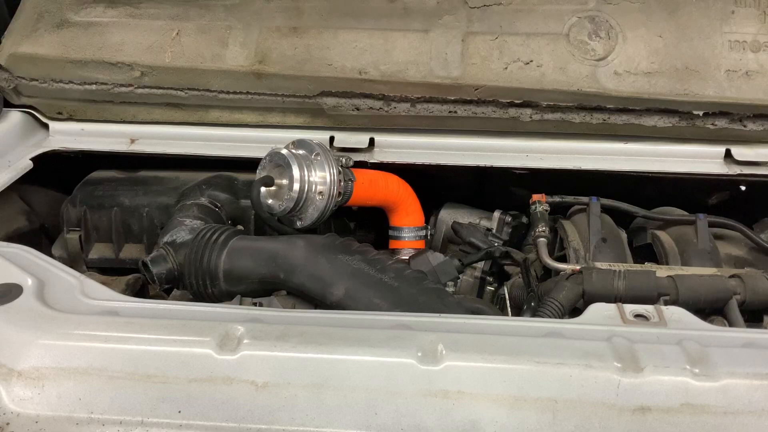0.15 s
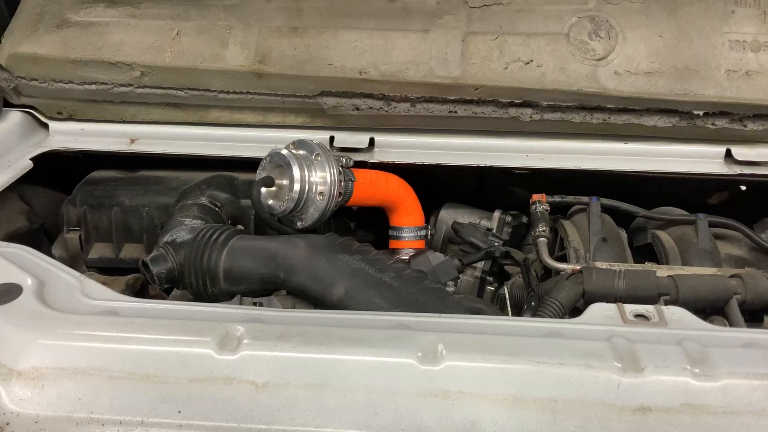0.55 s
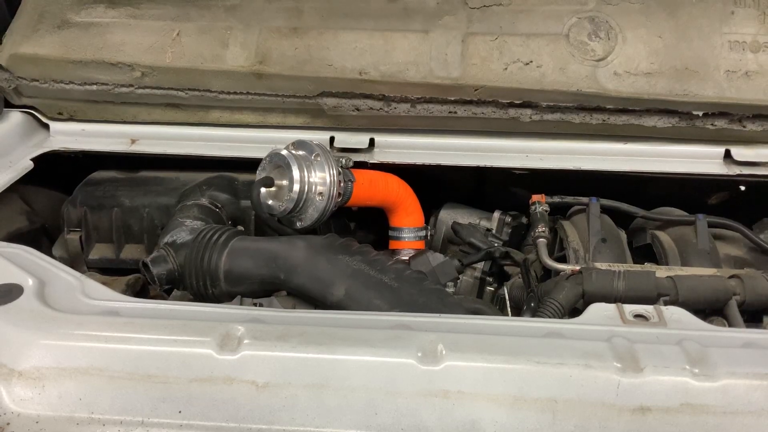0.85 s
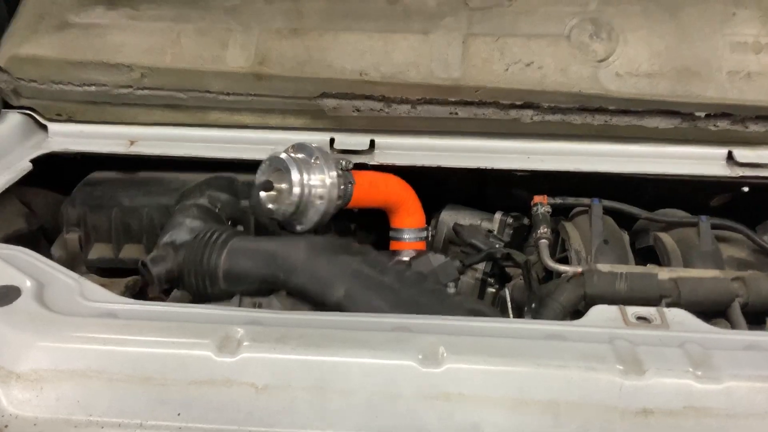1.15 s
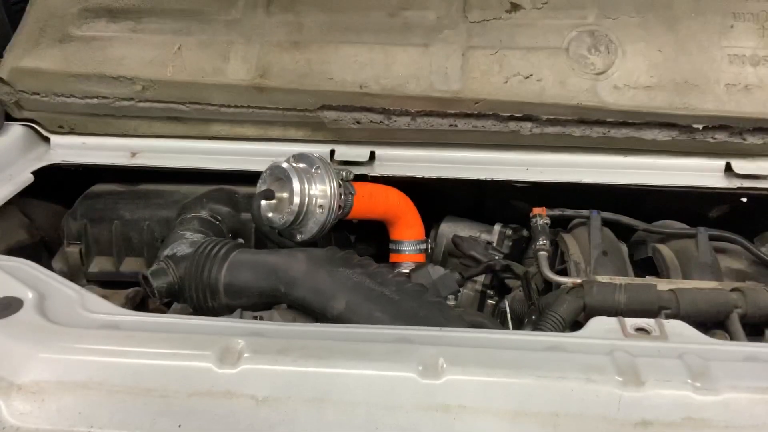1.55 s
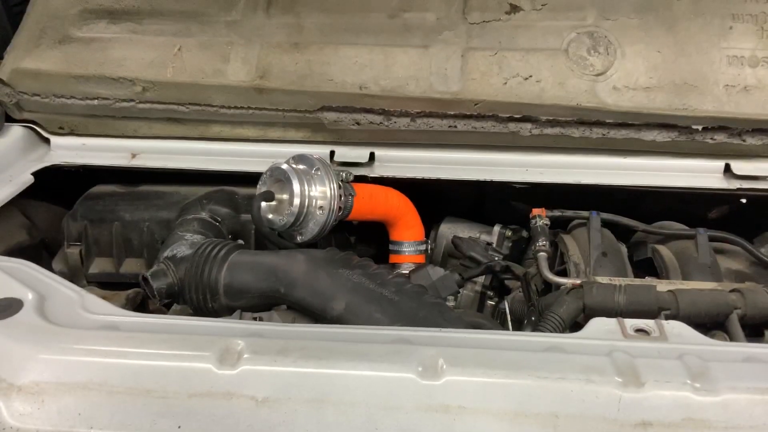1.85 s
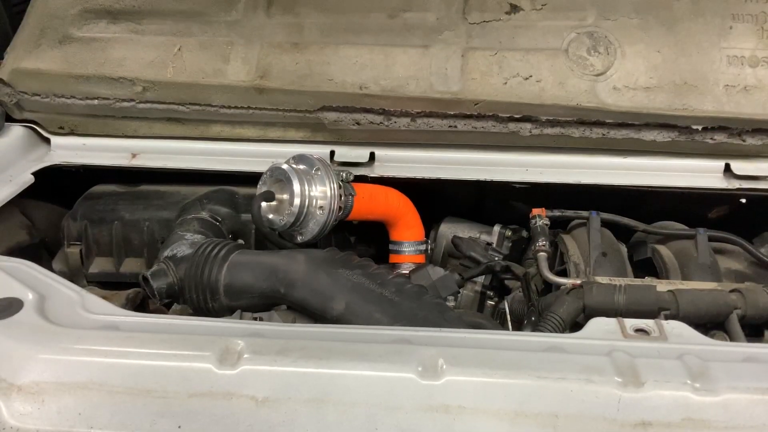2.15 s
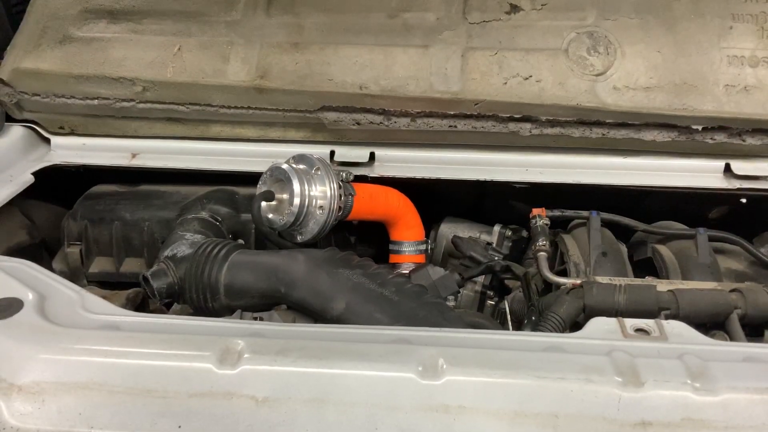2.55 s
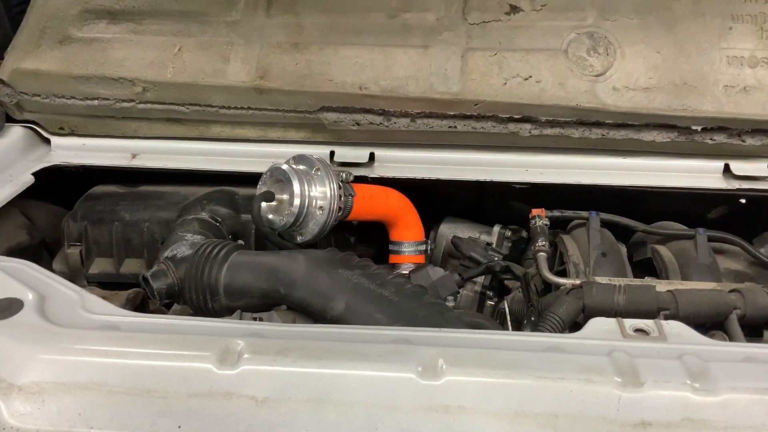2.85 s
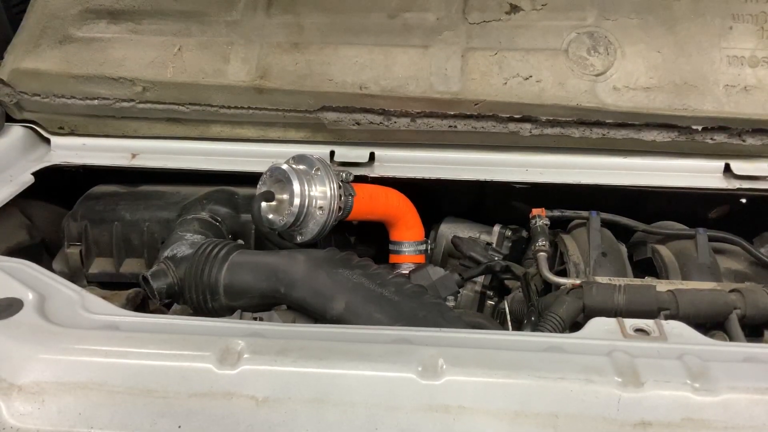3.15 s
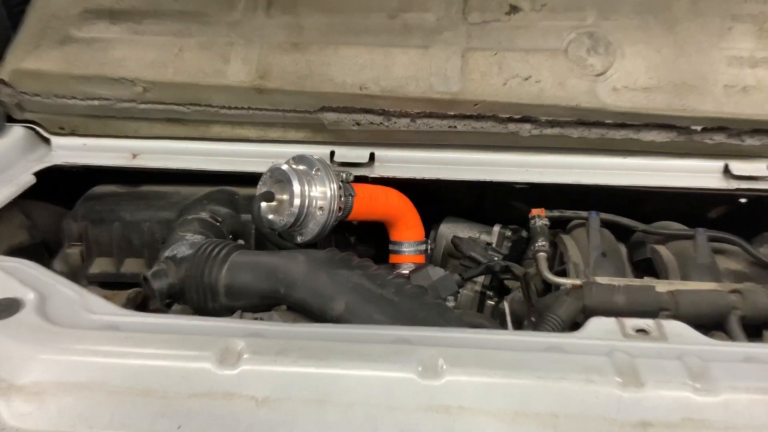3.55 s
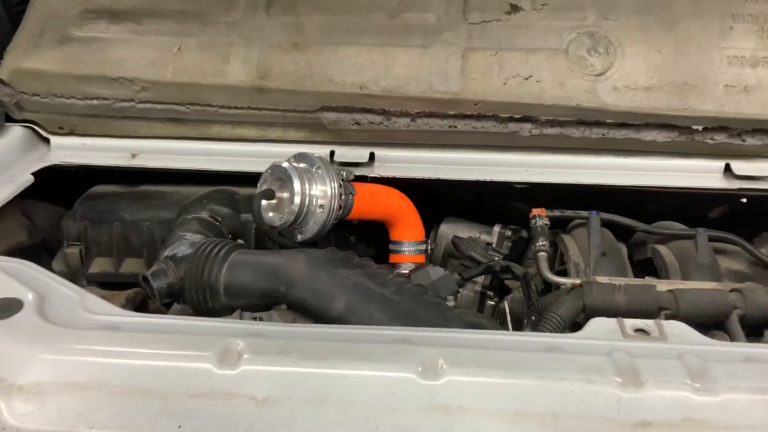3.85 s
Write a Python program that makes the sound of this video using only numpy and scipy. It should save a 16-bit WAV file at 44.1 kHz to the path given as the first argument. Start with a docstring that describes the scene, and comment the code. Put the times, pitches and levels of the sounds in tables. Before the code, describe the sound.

Car engine starting in its open bay: brief starter whirr, throbbing idle, sharp rev, blow-off hiss.

```python
"""A car engine starts and is blipped, heard from just above the open engine bay: each firing makes a deep gulp,
a click ringing through the air box. A thin whine and a relay thud come first; the starter, made of gear-tooth
clicks and tones, cranks three times. The engine catches and idles with clattering valve gear and ticking
injectors (shaped noise), then revs up with a rasp until the throttle shuts, chuffs and a blow-off valve hisses.
"""
import sys
import numpy as np
from scipy import signal
from scipy.fft import rfft, irfft
from scipy.io import wavfile
from scipy.ndimage import uniform_filter1d

SR = 44100
rng = np.random.default_rng(int(sys.argv[2]) if len(sys.argv) > 2 else 0)


def to_wav(s):
    """Save 16-bit WAV."""
    ch = np.atleast_2d(s).T  # columns
    pcm = np.round(np.clip(ch, -1, 1) * 32767)  # PCM
    wavfile.write(sys.argv[1], SR, pcm.astype(np.int16))


N = 176400
T = np.arange(N) / SR  # seconds
FREQS = np.fft.rfftfreq(N, 1 / SR)  # Hz

# Engine speed. Each row: time in seconds, firings per second.
ENGINE_SPEED = [(0.7, 4.3), (0.9, 8.37), (1.05, 6.56), (1.15, 19.77), (1.25, 28.46), (1.37, 33.78),
                (1.5, 34.15), (1.68, 32.57), (2.05, 32.64), (2.4, 33.18), (3.0, 32.59), (3.17, 36.8),
                (3.3, 45.38), (3.45, 64.33), (3.6, 91.69), (3.7, 103.71), (3.78, 100.0), (4.0, 91.0)]
# Strength of the intake gulps. Each row: time in seconds, relative level in dB.
GULP_LEVEL = [(1.07, -70), (1.11, 0), (1.2, .5), (1.35, .5), (2.0, -.3), (3.0, -.3), (3.12, -2), (3.3, 1.2),
              (3.42, -.8), (3.51, -1.3), (3.6, -6.5), (3.69, -6), (3.76, -13), (3.89, -17), (4.0, -9)]
# How the air box responds to a gulp. Each row: frequency in Hz, relative level in dB.
AIR_BOX = [(20, -42), (50, -14), (66, -4.5), (99, 1.2), (132, -3), (165, -9), (198, -21), (231, -26),
           (264, -17.5), (297, -14), (330, -29), (362, -27), (410, -46), (1200, -85)]
# The softer gulp of a cylinder that has not fired. Each row: frequency in Hz, relative level in dB.
UNFIRED_PUFF = [(15, -21.5), (35, -10.5), (75, 2.5), (100, -16.5), (135, -33), (300, -42.5)]
# Rasp of the open throttle. Each row: time in seconds, relative level in dB.
RASP_LEVEL = [(3.05, -55), (3.25, -30), (3.38, -22.5), (3.53, -20), (3.59, -14), (3.65, -20), (3.76, -25),
              (3.82, -36)]
# Colour of the rasp in the intake pipe. Each row: frequency in Hz, relative level in dB.
INTAKE_PIPE = [(130, -20), (200, 1), (290, 5), (370, -6), (720, -4), (850, -14), (1150, -13), (2500, -32.5)]
# Strength of each cylinder's bark: one relative level in dB per cylinder, in firing order.
CYLINDER_BARK = [2, -1.5, 1, -2.5]
# Air surging back against the shut throttle. Each row: time in seconds, level in dB.
CHUFF_TIMES = [(3.73, -15), (3.768, -15), (3.86, -21), (3.92, -16), (3.995, -14)]
# Clatter of the running engine. Each row: time in seconds, level in dB before its throb.
CLATTER_LEVEL = [(1.08, -56), (1.3, -23), (1.45, -31), (1.7, -34.5), (3.0, -34.5), (3.2, -31), (3.45, -23),
                 (3.6, -18.5), (3.67, -19), (3.76, -17.5), (3.81, -26.5), (4.0, -23)]
# Colour of the clatter from the engine block. Each row: frequency in Hz, relative level in dB.
ENGINE_BLOCK = [(240, 1.5), (400, 4), (700, 0.5), (850, -3), (1120, -3), (1400, -7), (2050, -3), (2700, -9),
                (5000, -14.5), (9000, -13.5), (14000, -46)]
# Injector ticks after each firing. Each row: delay in seconds, relative level in dB, decay in seconds.
INJECTOR_TICKS = [(.0064, -24.5, 0.0024), (0.0098, -25.5, 0.0081)]
# Colour of the injector ticks. Each row: frequency in Hz, relative level in dB.
INJECTOR_COLOUR = [(1500, -67), (4000, -11), (8000, -9), (9900, -3), (11500, -4.5), (14500, 2), (16000, -1)]
# Air hissing past the throttle. Each row: time in seconds, level in dB before its flicker.
THROTTLE_AIR = [(.5, -77), (.68, -34), (1.05, -32), (1.09, -24.5), (1.31, -21), (1.38, -36.5), (1.7, -50),
                (3.1, -46), (3.3, -32), (3.55, -24.5), (3.77, -15.5), (4.0, -29)]
# Blow-off valve. Each row: time in seconds, level in dB before its flicker.
BLOW_OFF_VALVE = [(3.76, -60), (3.79, -22), (3.815, -17), (3.87, -13), (4.0, -15.5)]
# Colour of hissing air. Each row: frequency in Hz, relative level in dB.
HISS_COLOUR = [(1500, -27), (4000, -8.5), (6500, -6), (9500, -2.5), (11300, 1), (13500, 0.5), (15500, 0.5)]
# Starter gear speed. Each row: time in seconds, tooth strikes per second (Hz) before the crank swing.
GEAR_MESH = [(.5, 250), (.61, 335), (.67, 312), (.71, 510), (.78, 510), (.9, 545), (1.12, 540), (1.21, 706),
             (1.32, 714), (1.55, 442)]
# Grinding of the starter gears. Each row: time in seconds, level in dB before the crank swell.
GRIND_LEVEL = [(.5, -51), (.525, -19), (.55, -23), (.59, -21), (.69, -25), (1.0, -25), (1.08, -22),
               (1.32, -24), (1.38, -66)]
# Clean gear whine. Each row: time in seconds, then the levels in dB, before the load swell,
# of the tooth-strike tone, of its 2nd multiple and of its 3rd multiple.
GEAR_TONES = [(.5, -60, -70, -70), (.55, -28, -36, -38), (.6, -29, -34, -36), (.64, -21, -29, -34),
              (.68, -44, -55, -55), (.76, -19.5, -35, -35), (1.08, -19.5, -33, -30), (1.14, -45, -43, -31),
              (1.32, -48, -48, -27), (1.39, -75, -75, -70)]
# Ringing of the bell housing. Each row: frequency in Hz, relative level in dB.
BELL_HOUSING = [(200, -8), (500, 3), (700, -3.5), (1100, 3.5), (2100, 0.5), (4300, -4.5), (6000, -12.5),
                (8200, -12), (15000, -71)]
# Separate knocks. Each row: time in seconds, level in dB, decay in seconds, ring frequency in Hz,
# ring level in dB and crash level in dB (these two relative to the knock).
KNOCK_TIMES = [(0.229, -41.5, 0.0095, 1430, -2, 3.5), (0.292, -44, 0.023, 320, -2, -14),
               (0.461, -26, 0.02, 172, 1, -14.5), (0.521, -17, 0.031, 680, -2, 1.5),
               (0.542, -15, 0.02, 281, 0, 6.5), (0.555, -25.5, .016, 1144, -3, 2),
               (1.314, -18.5, 0.0063, 450, 0, -6)]
# Colour of a metal crash. Each row: frequency in Hz, relative level in dB.
METAL_CRASH = [(100, -15), (400, -4.5), (1200, -3), (3000, -14.5), (7000, -17.5), (10000, -16.5),
               (15000, -22.5)]
# Ringing colour of the faint noise under the ignition whine. Each row: frequency in Hz, relative level in dB.
ROOM_COLOUR = [(1000, -27), (1450, 9), (2400, -20), (4300, 0.5), (6000, -14)]
# Low rumble of the engine bay. Each row: time in seconds, level in dB before its slow wander.
RUMBLE_LEVEL = [(0, -52), (1.05, -42), (1.25, -29), (1.45, -38), (3.0, -40), (3.3, -29), (4.0, -26)]
# Colour of the engine bay. Each row: frequency in Hz, relative level in dB.
BAY_COLOUR = [(20, -54), (45, -9), (150, 3.5), (220, -9.5), (330, -1), (900, -39)]
# Phase turn between left and right, widening the stereo image. Each row: frequency in Hz, whole turns.
LEFT_PHASE_TURNS = [(20, 0), (130, -.04), (330, 0), (830, .5), (1450, 1.5), (2700, 2.5), (4900, 4.5),
                    (7400, 6.5), (10600, 8.5), (15200, 11.5)]
# Share of sound common to both channels. Each row: frequency in Hz, likeness from 0 to 1.
CHANNEL_LIKENESS = [(160, 1), (280, .9), (600, .55), (2000, .6), (6000, .62), (12000, .82)]
# Left-right balance. Each row: frequency in Hz, left minus right level in dB.
LEFT_RIGHT_DB = [(100, 0.5), (280, 0), (600, -5.5), (1300, -4.5), (2800, -1.2), (12000, 0)]

FIRST_FIRING_S, FIRED_AFTER_S, THROTTLE_SHUT_S = 1.128, 1.1, 3.71
GULP_GAIN_DB, GULP_SCATTER_DB, GULP_SCATTER_S = 44, .35, .00008
OVERRUN_SCATTER_DB, OVERRUN_SCATTER_S = 3.5, .0016
REFLECTION, REFLECTION_S, REFLECTION_SPAN_S = .55, 3.48, .11  # peak gain, time of peak, spread
BOUNCE, BOUNCE_DELAY_S, CATCH_S, CATCH_SPAN_S = .3, .014, 1.33, .22  # peak gain, delay, time of peak, spread
PUFF_DB, PUFF_FADE_DB_PER_S = 37.5, 2  # level at 0.9 s, and its fade
BARK_DELAY_S, BARK_SCATTER_DB = .0028, 1.5
CHUFF_S = .016
CRANK_SWING, CRANK_LAG, MESH_JITTER = .16, .11, .009  # speed fraction, firing turns, speed fraction
CRANK_SWELL_DB, GRIND_DB = 4, 5.5
TONE_SWELL_DB, TONE_LAG = 9, .16  # the lag is in firing turns
WHINE_HZ, WHINE_WIDTH_HZ = 12400, 310
WHINE_DB, WHINE_HISS_DB, ROOM_DB = -36.5, -44, -50
WHINE_ON_S, WHINE_OFF_S = 0.04, 0.34
LOW_CUT_HZ, TOP_HZ = 14, 15750


def undb(db):
    """Turn decibels into gain."""
    return 10 ** (np.asarray(db) / 20)


def unit(x):
    """Scale to an average strength (rms) of 1."""
    return x / np.sqrt(np.mean(x ** 2))


def curve(rows, axis=1):
    """Join one column of a table by straight lines in time."""
    rows = np.array(rows, float)
    return np.interp(T, rows[:, 0], rows[:, axis])


def over_hz(rows):
    """Join a table by straight lines over log frequency."""
    rows = np.array(rows, float)
    return np.interp(np.log(FREQS + 1), np.log(rows[:, 0]), rows[:, 1])


def colour(x, rows):
    """Filter a sound by a table of frequencies and levels."""
    return irfft(rfft(x) * undb(over_hz(rows)), N)


def noise(rows):
    """Make coloured noise of rms 1."""
    return unit(colour(rng.standard_normal(N), rows))


def ring(hz, width_hz):
    """Make noise in one resonance, rms 1; at 0 Hz it is a slow random wander."""
    resonance = 1 + ((FREQS - hz) / width_hz) ** 2
    return unit(irfft(rfft(rng.standard_normal(N)) / resonance, N))


def pulses(times, sizes):
    """Place clicks at the given times, each shared between two samples for exact timing."""
    at = np.clip(np.asarray(times) * SR, 0, N - 2)
    i = at.astype(int)
    sizes = sizes * (at > 0) * (at < N - 2)
    return np.bincount(i, sizes * (1 - at + i), N) + np.bincount(i + 1, sizes * (at - i), N)


def wraps(phase):
    """Find the times at which a rising phase passes a whole turn."""
    return np.interp(np.arange(np.ceil(phase[0]), phase[-1]), phase, T)


def fade(x, decay_s):
    """Give each click an exponential tail."""
    return signal.lfilter([1], [1, -np.exp(-1 / (SR * decay_s))], x)


def suck(x, rows):
    """Ring a cavity: a dip of suction, a rebound on the beat, then a dying ring."""
    # the log spectrum, folded to one side in time, gives a ring that starts at once and dies away
    cepstrum = irfft(np.log(undb(over_hz(rows))), N)
    one_sided = cepstrum * (1 + np.sign(np.fft.fftfreq(N)))
    response = -irfft(np.exp(rfft(one_sided)), N)
    on_the_beat = np.roll(response, -np.argmax(response))
    return irfft(rfft(x) * rfft(on_the_beat), N)


def intake(firings):
    """Each cylinder gulps through the air box: softly while cranking, hard once it fires."""
    late, size = rng.standard_normal((len(firings), 2)).T
    overrun = firings > THROTTLE_SHUT_S  # with the throttle shut the gulps turn ragged
    times = firings + late * np.where(overrun, OVERRUN_SCATTER_S, GULP_SCATTER_S)
    gulps = pulses(times, undb(size * np.where(overrun, OVERRUN_SCATTER_DB, GULP_SCATTER_DB)))
    # as the revs pass the pipe's resonance, a reflection arrives midway between gulps
    between = (firings[1:] + firings[:-1]) / 2
    reflected = pulses(between, REFLECTION * np.exp(-((between - REFLECTION_S) / REFLECTION_SPAN_S) ** 2))
    # while the engine catches, each gulp bounces back along the duct
    fired = firings[firings > FIRED_AFTER_S]
    bounced = pulses(fired + BOUNCE_DELAY_S, BOUNCE * np.exp(-((fired - CATCH_S) / CATCH_SPAN_S) ** 2))
    train = gulps + reflected + bounced
    cranking = (T > .7) * (T < 1.1) * undb(PUFF_DB - PUFF_FADE_DB_PER_S * (T - 0.9))
    hard = suck(train * undb(GULP_GAIN_DB + curve(GULP_LEVEL)), AIR_BOX)
    soft = suck(train * cranking, UNFIRED_PUFF)
    return hard + soft


def rasp(firings, breath_db=-7, decay_s=0.0026):
    """Under load each gulp barks in the intake pipe, with a puff of turbulence."""
    scatter = BARK_SCATTER_DB * rng.standard_normal(len(firings))
    barks = pulses(firings + BARK_DELAY_S, undb(np.resize(CYLINDER_BARK, len(firings)) + scatter))
    puffs = unit(fade(barks, decay_s) * rng.standard_normal(N))
    piped = unit(colour(unit(barks) + undb(breath_db) * puffs, INTAKE_PIPE))
    return 0.84 * piped * undb(curve(RASP_LEVEL))


def chuffs():
    """Air surges in the intake after the throttle shuts, in short low puffs of noise."""
    return noise(BAY_COLOUR) * sum(undb(db) * np.exp(-((T - at) / CHUFF_S) ** 2) for at, db in CHUFF_TIMES)


def machinery(phase, firings, throb_db=2.6, tick_scatter_db=1.5):
    """Valve gear clatters, swelling once per firing; injectors tick twice after each firing."""
    throb = throb_db * np.cos(2 * np.pi * (phase - .6))
    clatter = noise(ENGINE_BLOCK) * undb(curve(CLATTER_LEVEL) + throb)
    fired = firings[firings > FIRED_AFTER_S]
    sizes = undb(tick_scatter_db * rng.standard_normal(len(fired)))
    ticks = sum(fade(pulses(fired + delay, sizes * undb(db)), decay_s) for delay, db, decay_s in INJECTOR_TICKS)
    softened = uniform_filter1d(ticks, size=24)  # size in samples
    return clatter + softened * noise(INJECTOR_COLOUR)


def air(flicker_db=1.74):
    """Air hisses past the throttle and the blow-off valve dumps the boost, as flickering noise."""
    level = undb(curve(THROTTLE_AIR)) + undb(curve(BLOW_OFF_VALVE))
    return noise(HISS_COLOUR) * level * undb(flicker_db * ring(0, 60))


def starter(phase, tooth_scatter_db=3.0, grind_s=0.0018):
    """Pinion teeth strike the ring gear; every compression drags the whine down and makes it louder."""
    cranking = np.interp(T, [.66, .72, 1.09, 1.14], [0, 1, 1, 0])
    stroke = 2 * np.pi * (phase - CRANK_LAG)
    hz = curve(GEAR_MESH) * (1 - CRANK_SWING * np.sin(stroke) * cranking)
    mesh = np.cumsum(hz * (1 + MESH_JITTER * ring(0, 83.0))) / SR  # teeth passed so far
    times = wraps(mesh)
    teeth = pulses(times, undb(tooth_scatter_db * rng.standard_normal(len(times))))
    grind = unit(fade(teeth, grind_s) * rng.standard_normal(N))
    gears = unit(colour(unit(teeth - teeth.mean()) + undb(GRIND_DB) * grind, BELL_HOUSING))
    gear_level = undb(curve(GRIND_LEVEL) + CRANK_SWELL_DB * np.cos(stroke) * cranking)
    # the teeth sing most clearly while they carry the load of a compression
    load = undb(TONE_SWELL_DB * cranking * (np.cos(2 * np.pi * (phase - TONE_LAG)) - 1.5))
    whine = 0
    for k in range(1, len(GEAR_TONES[0])):
        whine = whine + np.sqrt(2) * np.sin(2 * np.pi * k * mesh) * undb(curve(GEAR_TONES, axis=k))
    running = (T > GEAR_MESH[0][0]) * (T < GEAR_MESH[-1][0])
    return (gears * gear_level + whine * load) * running


def knocks(attack_s=0.0079):
    """Small ticks, the relay's thud, solenoid and pinion slamming home, and a clunk as the pinion drops out."""
    out = 0
    for at, db, decay_s, hz, ring_db, crash_db in KNOCK_TIMES:
        rise = np.clip((T - at) / attack_s + 1, 0, 1)
        shape = rise * np.exp(-np.maximum(T - at, 0) / decay_s)
        body = undb(ring_db) * ring(hz, hz * 0.18) + undb(crash_db) * noise(METAL_CRASH)
        out = out + undb(db) * shape * body
    return out


def ignition_whine(release_s=0.011):
    """A thin electric whine and fizz while the ignition is on, before the start, made of filtered noise."""
    gate = (T > WHINE_ON_S) * np.exp(-np.maximum(T - WHINE_OFF_S, 0) / release_s)
    whine = undb(WHINE_DB) * ring(WHINE_HZ, WHINE_WIDTH_HZ)
    fizz = undb(WHINE_HISS_DB) * noise(HISS_COLOUR)
    return gate * (whine + fizz + undb(ROOM_DB) * noise(ROOM_COLOUR))


def background(floor_db=-56, lump_db=3):
    """A low rumble of noise wanders slowly in level over a faint steady noise."""
    rumble = noise(BAY_COLOUR) * undb(curve(RUMBLE_LEVEL) + lump_db * ring(0, 3.9))
    return rumble + undb(floor_db) * noise(METAL_CRASH)


def bay_echo(x, length_s=0.18):
    """Dense reflections from bonnet and garage: dying noise, evened out over frequency."""
    response = rfft(rng.standard_normal(N) * np.exp(-T / .06) * (T > .002))
    flat = irfft(response / np.sqrt(uniform_filter1d(np.abs(response) ** 2, size=200)), N)
    return signal.fftconvolve(x, flat * (T < length_s))[:N]


def stereo(x):
    """The shared sound is turned in phase on the left; above the bass each side has its own reflections."""
    direct = rfft(x)
    like = np.clip(over_hz(CHANNEL_LIKENESS), 0, 1)
    turn = np.exp(-2j * np.pi * np.interp(FREQS, *np.array(LEFT_PHASE_TURNS).T))
    left = np.sqrt(like) * direct * turn + np.sqrt(1 - like) * rfft(bay_echo(x))
    right = np.sqrt(like) * direct + np.sqrt(1 - like) * rfft(bay_echo(x))
    tilt = undb(over_hz(LEFT_RIGHT_DB) / 2)
    return np.array([irfft(left * tilt, N), irfft(right / tilt, N)])


def scene():
    """One crank phase, counted in firings, drives the intake, rasp, clatter, ticks and starter load."""
    phase = np.cumsum(curve(ENGINE_SPEED)) / SR
    phase = phase - np.interp(FIRST_FIRING_S, T, phase)
    firings = wraps(phase)
    engine = intake(firings) + rasp(firings) + chuffs() + machinery(phase, firings) + air()
    starting = starter(phase) + knocks() + ignition_whine()
    return stereo(engine + starting + background()) * (T > WHINE_ON_S)


def record(dry):
    """Cut the deepest bass, round the highest peaks and cut the top."""
    dry = irfft(rfft(dry) * FREQS ** 4 / (FREQS ** 4 + LOW_CUT_HZ ** 4), N)
    held = dry / (1 + (dry / .92) ** 8) ** (1 / 8)
    return signal.sosfilt(signal.ellip(10, .2, 80, TOP_HZ, fs=SR, output="sos"), held)


dry = scene()
out = record(dry)
to_wav(out)
```